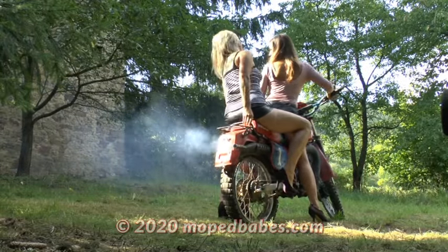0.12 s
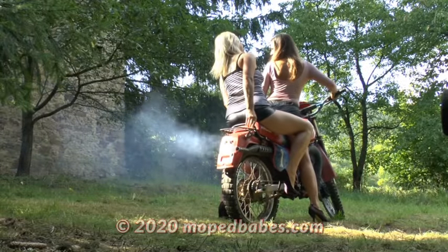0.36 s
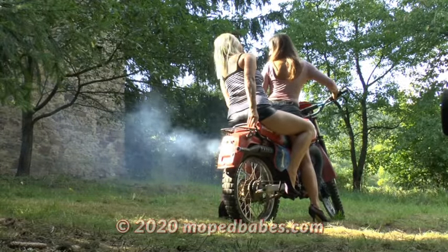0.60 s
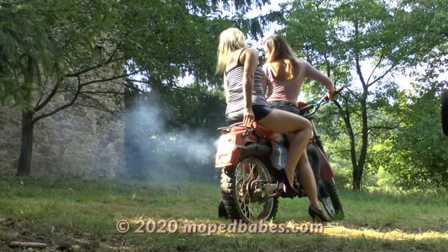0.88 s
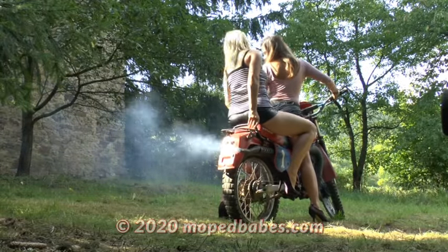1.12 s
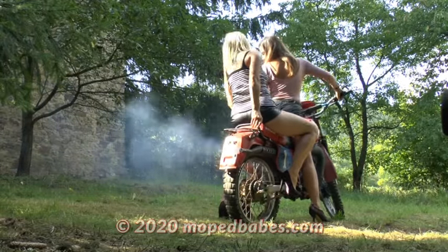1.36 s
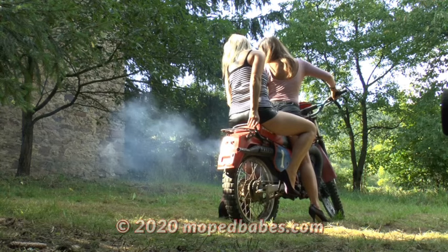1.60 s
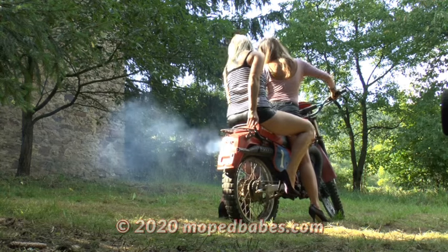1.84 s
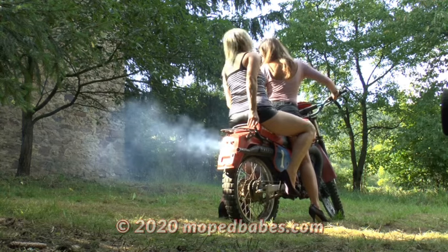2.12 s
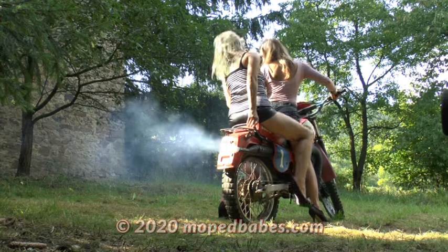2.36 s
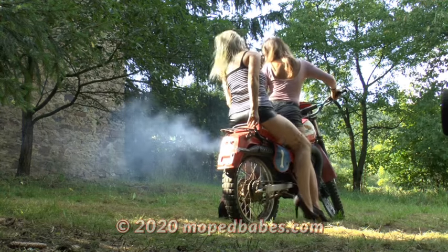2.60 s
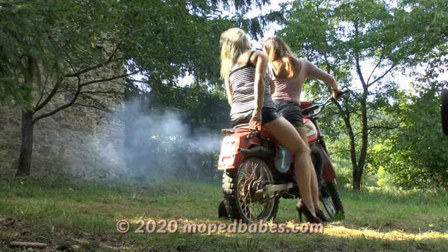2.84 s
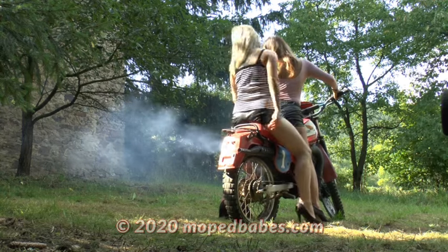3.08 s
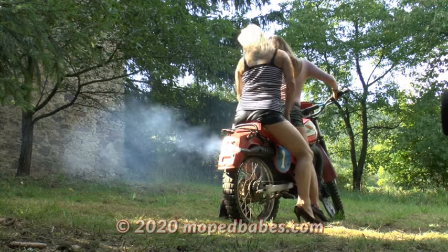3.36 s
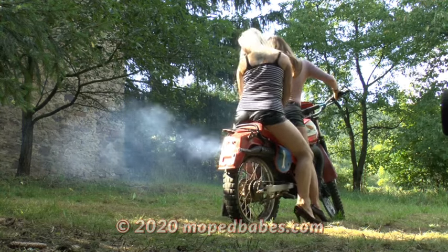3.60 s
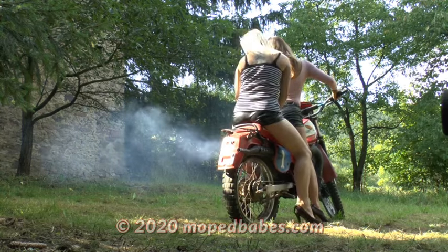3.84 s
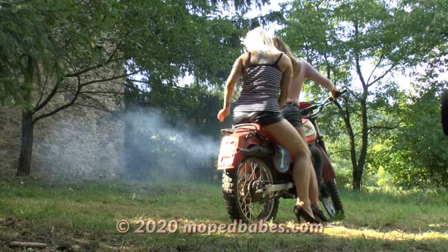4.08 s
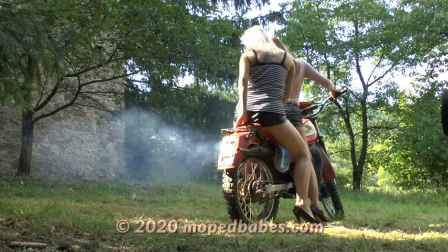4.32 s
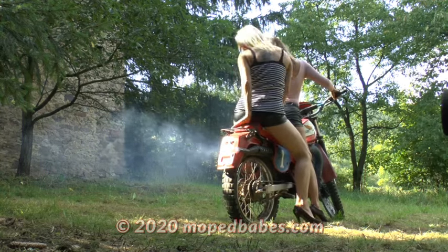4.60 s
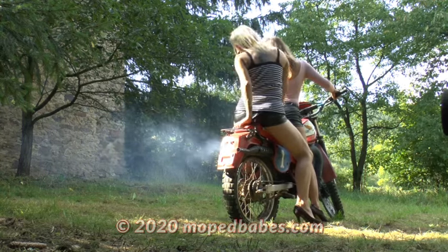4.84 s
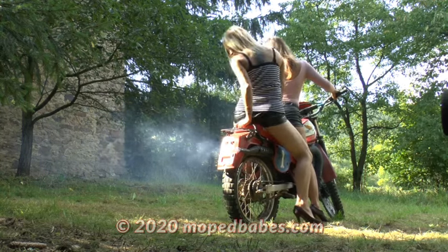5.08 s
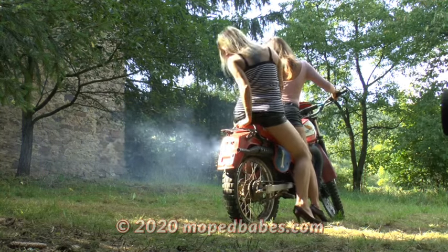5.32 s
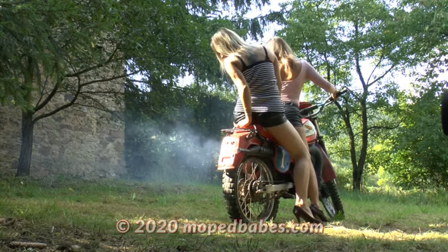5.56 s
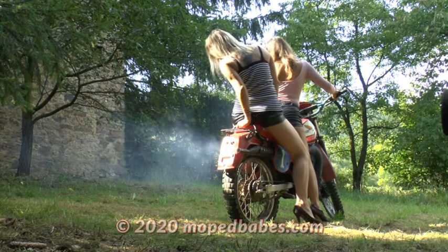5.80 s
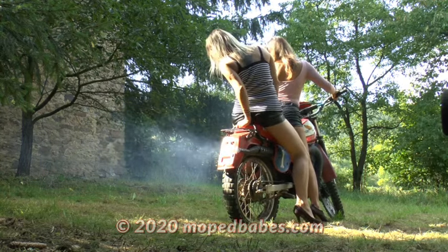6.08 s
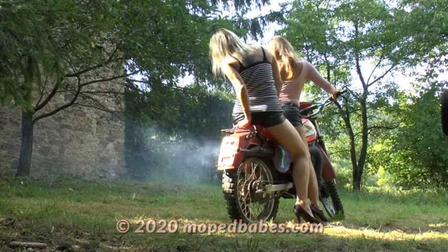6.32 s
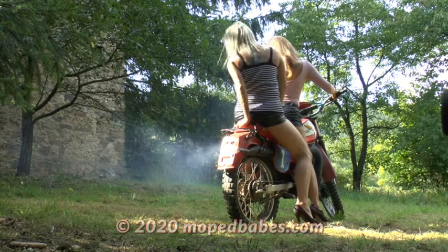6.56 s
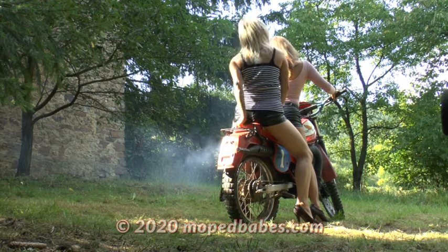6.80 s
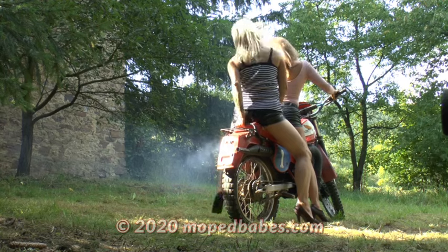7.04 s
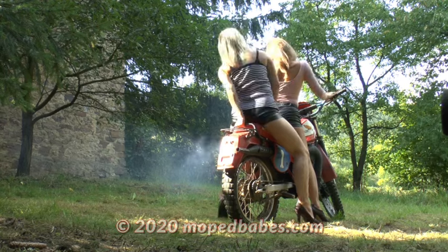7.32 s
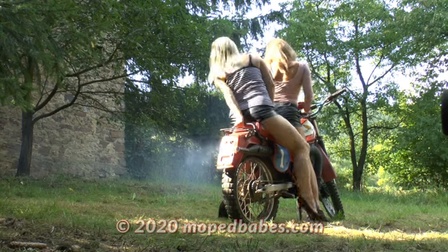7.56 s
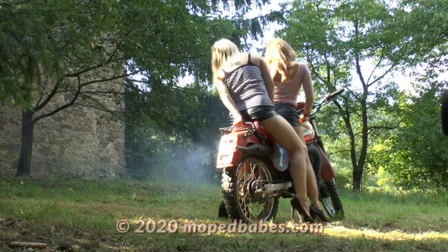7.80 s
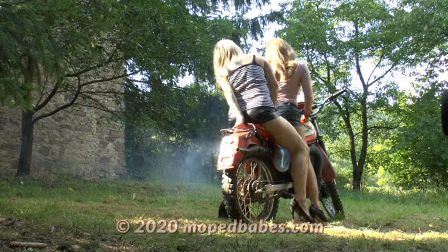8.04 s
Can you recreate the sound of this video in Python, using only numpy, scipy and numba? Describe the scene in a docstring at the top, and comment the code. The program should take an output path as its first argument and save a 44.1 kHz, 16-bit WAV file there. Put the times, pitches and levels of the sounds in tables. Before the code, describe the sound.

Outdoors, a little two-stroke bike idles in stuttering bursts of ringing pops, revs briefly twice, then sinks gradually into slower, regular clusters of putters.

```python
"""A small two-stroke engine stands on a lawn some metres away and idles down in short bursts of sharp pops.
Just before 1 s, and again from about 2.2 s, the throttle is blipped: every turn fires and the speed climbs.
Around 3.8 and 4 s come two brief runs of pops; then the bursts go on while the engine slows to the end.
Pops and soft puffs ring exhaust modes; filtered noise makes gas hiss and clatter. A wall and leaves return
dulled sound, and a faint outdoor rumble and hum lie below. All of it is heard in stereo."""
import sys
import numpy as np
from scipy import signal
from scipy.fft import rfft, irfft
from scipy.io import wavfile
from scipy.ndimage import uniform_filter1d
from numba import njit

SR = 44100
rng = np.random.default_rng(int(sys.argv[2]) if len(sys.argv) > 2 else 0)


def elevation(decibels):
    """Turn decibel levels (scalar or array-like) into linear amplitude ratios."""
    levels = np.asarray(decibels, float)
    return 10 ** (levels / 20)


def put_to_file(sound):
    """Save the sound as 16-bit audio at rate SR, in the file named by the first command-line argument."""
    columns = np.atleast_2d(sound).T  # one column per channel
    safe = np.clip(columns, -1, 1)
    whole_steps = np.round(safe * 32767)
    wavfile.write(sys.argv[1], SR, whole_steps.astype(np.int16))


N = 360297
T = np.arange(N) / SR

# Bursts of pops on successive turns. Each row: start in seconds, number of turns that fire,
# level of the first pop in dB, level of the last pop in dB (a lone pop takes the first).
BURSTS = [(0.007, 5, -10, -7), (0.2031, 3, -3, -4.5), (0.398, 2, -14, -5.5), (0.5461, 2, -3.5, -6),
          (0.6856, 3, -5, -6), (0.8643, 3, -9, -4), (1.3699, 1, -8.5, 4), (1.4423, 3, -20, -10),
          (1.5492, 3, -3.5, -11), (1.6502, 3, -11, -9), (1.737, 2, -7, -6.5), (1.7986, 5, -9.5, -6),
          (1.9307, 4, -2, -18), (2.047, 5, -8, -6), (2.455, 2, -13, -5), (2.536, 2, -10, -3.5),
          (2.6098, 2, -10, -4.5), (2.6936, 2, -8, -3), (2.7786, 2, -2.5, -9), (2.873, 1, -3.5, -4),
          (2.9615, 2, -12, -5.5), (3.0683, 2, -8, -5.5), (3.177, 2, -7, -8), (3.2796, 3, -7, -18),
          (3.3673, 2, -6, -2.5), (3.4658, 4, -7, -11), (3.5825, 3, -6, -4.5), (3.7203, 4, -6, -4.5),
          (3.8899, 5, -12, -4), (4.1142, 3, -8, -8), (4.2784, 3, -15, -7.5), (4.4389, 3, -7.5, -2.5),
          (4.595, 3, -18, -4), (4.734, 4, -6, -13), (4.9257, 3, -6, -14), (5.0981, 4, -6.5, -12),
          (5.265, 3, -17, -5.5), (5.424, 3, -7.5, -11), (5.5834, 3, -8, -5), (5.734, 4, -9, -7.5),
          (5.9123, 3, -5.5, -4.5), (6.078, 3, -5.5, -5), (6.2311, 4, -8, -13), (6.386, 4, -6.5, -7.5),
          (6.5407, 5, -4.5, -19), (6.708, 3, -7.5, -26), (6.8352, 3, -11, -3.5), (6.99, 4, -5.5, -37),
          (7.1319, 5, -19, -16), (7.286, 3, -17, -5), (7.427, 3, -7.5, -7), (7.5825, 5, -10, -16),
          (7.766, 4, -6.5, -14), (7.9352, 4, -8, -7.5), (8.1185, 4, -3.5, -32)]
# Runs in which every turn fires; the first two are the throttle blips. Each row: first pop, last pop in seconds.
RUNS = [(.9745, 1.2811), (2.156, 2.4184), (3.7962, 3.8806), (3.9862, 4.055)]
# Mean crank speed, before the ripple of the bursts. Each row: time in seconds, speed in turns per second.
MEAN_SPEED = [(0.0, 100), (0.16, 95.5), (0.39, 90), (0.66, 85.3), (0.95, 82.3), (1.0, 84.5), (1.07, 92.9),
              (1.21, 117), (1.25, 124), (1.32, 125.3), (1.75, 115), (2.02, 110.5), (2.14, 110), (2.18, 114),
              (2.32, 130), (2.39, 135), (2.46, 137), (2.61, 134), (3.23, 116.5), (3.57, 110.5), (3.93, 105),
              (4.09, 99.5), (4.57, 88.8), (5.07, 79.5), (5.4, 75.3), (5.75, 73.2), (6.3, 71.2), (8.17, 71)]
# Broad colour of hiss and rattle. Each row: frequency in Hz, relative density in dB per Hz.
NOISE_COLOUR = [(165, -22), (320, -3.5), (620, -6), (1050, -6.5), (1420, -10), (1800, -6.5), (2320, -5.5),
                (4320, -7), (5620, -10), (7650, -12), (8340, -9), (9050, -14.5), (10800, -20), (12700, -22),
                (15700, -34), (16250, -66)]
FULL_POP_DB = -4  # a full pop at a slow idle


def level(x, db):
    """Scale to an rms level in dB re 1."""
    return x * elevation(db) / np.sqrt(np.mean(x ** 2))


def band(x, kind, hz, order=2):
    """Butterworth filter."""
    return signal.sosfilt(signal.butter(order, hz, kind, fs=SR, output="sos"), x)


def clicks(times, db):
    """One impulse at each time."""
    out = np.zeros(N)
    np.add.at(out, np.clip((times * SR).astype(int), 0, N - 1), elevation(db))
    return out


def pops(when, db, heat):
    """The port opens on burnt gas: a sharp front rings the pipe, turbulent gas follows and dies away."""
    front = clicks(when, db)
    throttle_gain = elevation(2 * throttle())  # 2 dB more turbulence on the throttle
    rush = signal.lfilter([1], [1, -np.exp(-1 / (0.0049 * SR))], front)  # dies away over 4.9 ms
    turbulence = 0.066 * rush * throttle_gain * rng.standard_normal(N)
    turbulence = band(turbulence, "highpass", 1950.0)
    ring = exhaust(band(front, "highpass", 427.0, order=1) + turbulence, heat)
    tail = signal.lfilter([1], [1, -np.exp(-1 / (0.016 * SR))], front)  # dies away over 16 ms
    hiss = tail * throttle_gain * level(stereo_noise(NOISE_COLOUR), -12.5)
    return elevation(26) * ring + band(hiss, "highpass", 1520.0)


def firing_db(when):
    """Pop strength on each turn: the charge lights in bursts and runs, with faint misfires between."""
    # Strength of the pops in each run. Each row: level at the first pop, level at the last pop in dB.
    run_levels = [(-5, -8.5), (-5.5, -9.5), (-14, -9.5), (-13, -16.5)]
    fade_db_per_turn, thinning_db = -1.5, -2.5  # faster turns get a thinner charge
    chance = rng.standard_normal(len(when))
    db = -29 + 3 * chance
    full_db = FULL_POP_DB + thinning_db * np.interp(when, T, warmth()) + 0.88 * chance
    for first, turns, first_db, last_db in BURSTS:
        on = np.argmin(abs(when - first)) + np.arange(turns)
        # inner turns: full strength on the second, then fading
        burst_db = full_db[on % len(when)] + fade_db_per_turn * (on - on[0] - 1)
        burst_db[-1] = last_db
        burst_db[0] = first_db
        inside = on < len(when)
        db[on[inside]] = burst_db[inside]
    for run, ends_db in zip(RUNS, run_levels):
        on = slice(np.argmin(abs(when - run[0])), np.argmin(abs(when - run[1])) + 1)
        db[on] = np.interp(when[on], run, ends_db) + 1.6 * chance[on]
    return db


def crank():
    """Crank angle in turns, whole at each burst's first pop and at run ends; also the times of whole turns."""
    free = np.cumsum(speed()) / SR
    marks = np.sort(np.r_[np.array(BURSTS)[:, 0], np.ravel(RUNS)])
    at = np.interp(marks, T, free)
    whole = np.cumsum(np.round(np.diff(at, prepend=at[0])))
    turns = free + np.interp(T, marks, whole - at)
    when = np.interp(np.arange(np.ceil(turns[0]), turns[-1]), turns, T)
    return turns, when


def speed():
    """Each burst kicks the flywheel: speed rises, then sags; the ripple is smaller on a fast flywheel."""
    kick, rise_s, sag_s = 10, .03, .16  # kick: scale at the slowest mean speed
    mean = np.interp(T, *np.transpose(MEAN_SPEED))
    t = T[:SR // 2]
    shape = np.exp(-t / sag_s) - np.exp(-t / rise_s)
    kicks = signal.oaconvolve(clicks(np.array(BURSTS)[:, 0], 0), shape)[:N]
    ripple = kicks - uniform_filter1d(kicks, size=SR // 3)
    return mean + kick * mean.min() / mean * ripple


def warmth():
    """How hot and fast the engine runs, from mean speed: 0 at a slow idle, 1 at speed."""
    return np.clip((np.interp(T, *np.transpose(MEAN_SPEED)) - 72) / 45, 0, 1)


def throttle():
    """1 while the throttle is open, 0 otherwise, with 50 ms ramps."""
    is_open = sum(1. * ((T > a) & (T < b)) for a, b in RUNS[:2])
    return uniform_filter1d(is_open, size=SR // 20)


def levels(when, pop_db):
    """Drone level, clatter level and gas heat: levels grow with speed, all swell while the charge burns."""
    # Gas temperature in the pipe, before the swell of the bursts, as a factor on the exhaust modes.
    # Each row: time in seconds, factor.
    gas_heat = [(0, 1.074), (.5, 1.046), (.95, 1.01), (1.15, 1.08), (1.3, 1.18), (1.5, 1.077), (2.1, 1.037),
                (2.3, 1.15), (2.5, 1.15), (2.8, 1.135), (3.2, 1.05), (3.7, 1.01), (4.1, 1.058),
                (4.6, 1.046), (5.1, 1.043), (5.6, 1.05), (6.3, 1.003), (8.17, 0.99)]
    burn_s = 0.077  # the swell spreads over this time
    burn = np.interp(T, when, elevation(pop_db - FULL_POP_DB))
    burn = uniform_filter1d(burn, size=int(burn_s * SR))
    burn = uniform_filter1d(burn, size=int(burn_s * SR / 2))
    hot, is_open = warmth(), throttle()
    # on the throttle both the drone and the clatter are held down, so the pops stand clear
    drone_db = -23 + 6 * hot + 1 * burn - 10 * is_open
    clatter_db = -31.5 + 12 * hot + 7.5 * burn - 9 * is_open
    heat = np.interp(T, *np.transpose(gas_heat)) + 0.037 * burn
    return drone_db, clatter_db, heat


def exhaust(x, heat):
    """Ring the exhaust modes; each reaches the two microphone ports with its own balance and lead."""
    # Modes of the exhaust. Each row: frequency in Hz at a heat of 1, width in Hz, relative level in dB,
    # left minus right in dB, lead of the left port in radians (before the limit below).
    exhaust_modes = [(122, 33, 18.5, 1.5, -0.5), (195.4, 12.3, 20, 1, 0.8), (229, 28, 14.5, -1, 0),
                     (315, 120, 13, 6.5, 0.6), (425.2, 56, 29.5, 1.5, -0.25), (502.4, 66, 19, -8, -0.16),
                     (558.3, 38.3, 27.5, -2, -1), (790, 67, 25.5, -1.3, -0.55), (860.6, 40, 16.5, -3, 0.6),
                     (1060, 20.5, 14.5, -4, 0.8), (1167.5, 28.3, 22, -2.5, 0.5), (1596, 28, 17, -8.5, 0),
                     (1795, 55, 16, -1.5, 0.8), (1967, 29, 16.5, -2, 0.5), (2311, 39, 19.5, -4, -4),
                     (2620, 53, 19, -3, -7.5), (3046, 51.4, 28, -5, 0.5), (3940, 41, 17, -16, -1.4),
                     (4554, 68, 20, -9, -0.3), (4890, 92, 20.5, -4.5, 2.2), (5820, 260, 17, 7.5, 1.5),
                     (6320, 135, 19.5, 12, -3.5), (7170, 500, 1, 24, 5), (8460, 690, 16.5, 0.5, -1.3),
                     (9420, 110, 11.5, -16.5, 4), (10200, 2600, 8, 15, 4.5), (12550, 1000, 19, 2, -3.5),
                     (14500, 800, -3, 3.5, -0.5)]
    # How far a mode follows the gas heat. Each row: frequency in Hz, share.
    heat_share = [(120, 1.07), (430, 1.05), (570, 0.71), (820, 0.85), (1170, .6), (1500, 0.0049)]
    hz, width, db, pan_db, lead = (1. * v for v in np.transpose(exhaust_modes))
    # above 1 kHz neighbouring modes swing in opposite sense
    swing = -np.where(hz > 1000, (-1.) ** np.arange(len(hz)), 1)
    moves = np.interp(hz, *np.transpose(heat_share))
    # all speak through one tailpipe, so the lead between the ports stays small
    lead = np.clip(lead, -.6, .6)
    gain = np.array([swing * width / SR * elevation(db + side * pan_db) * np.exp(1j * side * lead)
                     for side in (.5, -.5)])
    ring = ring_modes(x, heat, hz, moves, width, gain, 0.0006)
    # the narrow tailpipe radiates almost no bass
    return band(ring, "highpass", 186.0, order=5)


@njit
def ring_modes(x, heat, hz, moves, width, gain, build_s):
    """Damped modes that build up over build_s seconds and follow the heat by their share."""
    out = np.zeros((2, len(x)))
    late = np.exp(-1 / (build_s * SR))
    for k in range(len(hz)):
        z, w, p = 0j, 0j, 0j
        for i in range(len(x)):
            if i % 32 == 0:
                p = np.exp((2j * hz[k] * (1 + moves[k] * (heat[i] - 1)) - width[k]) * np.pi / SR)
            # w, the faster-dying twin, is taken away to soften the onset
            z, w = z * p + x[i] + 1e-18, w * p * late + x[i] + 1e-18
            out[0, i] += (gain[0, k] * (z - w)).imag
            out[1, i] += (gain[1, k] * (z - w)).imag
    return out


def drone(when, db, heat):
    """Unburnt gas leaves as a soft puff on every turn; at speed the puff is sharper and fuller."""
    puffs = clicks(when, .8 * rng.standard_normal(len(when)))
    hot = warmth()
    # at a slow idle the pipe's back-flow gives a weaker second puff half a turn later
    back_flow = clicks((when[1:] + when[:-1]) / 2, -11.5) * (1 - hot) ** 2
    soft = band((puffs + back_flow) * (1 - hot), "bandpass", [260., 900.0])
    sharp = band(puffs * hot, "lowpass", 2430.0)
    ring = exhaust(soft + elevation(5.5) * sharp, heat)
    # even out the running level, so that db alone sets it
    running_rms = np.sqrt(uniform_filter1d((ring ** 2).mean(axis=0), size=SR // 8) + 1e-12)
    return elevation(db) * ring / running_rms


def clatter(turns, db, heat):
    """Gas hiss in the pipe and rattle of piston and chain, a little stronger early in each turn."""
    gate = 1 + .25 * np.cos(2 * np.pi * (turns - .2))
    hiss = exhaust(band(rng.standard_normal(N), "highpass", 1200.0), heat)
    # the rattle's level flickers at random by about 1.2 dB rms
    grain_db = level(band(rng.standard_normal(N), "lowpass", 610.0), 1.6)
    rattle = band(stereo_noise(NOISE_COLOUR) * elevation(grain_db), "highpass", 300.0, order=1)
    return elevation(db) * gate * (level(hiss, -10.0) + level(rattle, 0.062))


def stereo_noise(colour):
    """Coloured noise, much alike left and right up to 4 kHz and unrelated from 9 kHz."""
    # Likeness of left and right. Each row: frequency in Hz, correlation from 0 to 1.
    port_likeness = [(310, 0.9), (1510, 1), (4010, 1), (9010, 0)]
    log_hz = np.log(np.maximum(np.fft.rfftfreq(N + 1, 1 / SR), 1))
    colour_hz, colour_db = np.transpose(colour)
    like_hz, like = np.transpose(port_likeness)
    gain_db = np.interp(log_hz, np.log(colour_hz), colour_db)
    like = np.interp(log_hz, np.log(like_hz), like)
    mid, side = rfft(rng.standard_normal((2, N + 1)))
    side = side * np.sqrt(1 - like) * np.array([[1], [-1]])
    left, right = irfft(elevation(gain_db) * (mid * np.sqrt(1 + like) + side), N + 1)[:, :N]
    return np.array([left, np.roll(right, 2)])  # the left port is a little nearer


def wall_and_leaves(engine):
    """A late dull return: the wall sends it alike to both ports, leaves scatter its upper part differently."""
    t = T[:SR // 2]
    decay = (t > .012) * np.exp(-t / 0.063)  # seconds
    wall, left, right = rng.standard_normal((3, len(t))) * decay
    dull = band(engine, "lowpass", 2370.0)
    back = signal.oaconvolve(dull, wall[None], axes=1)
    leaves = signal.oaconvolve(band(dull, "highpass", 830.0), np.array([left, right]), axes=1)
    return (elevation(-37.0) * back + elevation(-40.0) * leaves)[:, :N]


def rumble():
    """Faint low outdoor rumble in gusts and a wavering hum; both sink while the engine runs fast."""
    mid, side, waver, gust = rng.standard_normal((4, N))
    waver_db = level(band(waver, "lowpass", 3.5), 13)  # about 4.5 dB rms
    hum = np.sin(2 * np.pi * 49.5 * T) * elevation(waver_db - 56)
    gust_db = level(band(gust, "lowpass", 4.0), 5.5)  # about 1.9 dB rms
    air = (mid + 0.33 * side * np.array([[1], [-1]])) * elevation(gust_db)
    low = level(band(air, "bandpass", [22., 60.]), -53.5)
    low = low + level(band(air, "bandpass", [70., 190.]), -51)
    return (hum + low) * elevation(-3 * warmth())


def scene():
    """Engine layers, their return from the wall and leaves, and the rumble."""
    turns, when = crank()
    pop_db = firing_db(when)
    drone_db, clatter_db, heat = levels(when, pop_db)
    engine = pops(when, pop_db, heat)
    engine = engine + drone(when, drone_db, heat)
    engine = engine + clatter(turns, clatter_db, heat)
    return engine + wall_and_leaves(engine) + rumble()


@njit
def follow(x, attack, release):
    """Peak follower, quick to rise and slow to fall."""
    y, e = np.empty(len(x)), x[:2000].mean()
    for i in range(len(x)):
        e += (x[i] - e) * (attack if x[i] > e else release)
        y[i] = e
    return y


def roll_off(x):
    """The treble ends steeply here."""
    return signal.sosfilt(signal.butter(12, 16960, fs=SR, output="sos"), x)


def record(dry):
    """Gain control turns down what rises above -21 dB, so the level dips after loud pops; peaks clip."""
    attack_s, release_s = 0.0023, .06
    loud = follow(abs(dry).max(axis=0), 1 / (attack_s * SR), 1 / (release_s * SR))
    gain = np.minimum(elevation(-21.0) / loud, 1) ** 0.37
    mix = np.clip(dry * gain, -1, 1)
    return roll_off(mix)


dry = scene()
out = record(dry)
put_to_file(out)
```